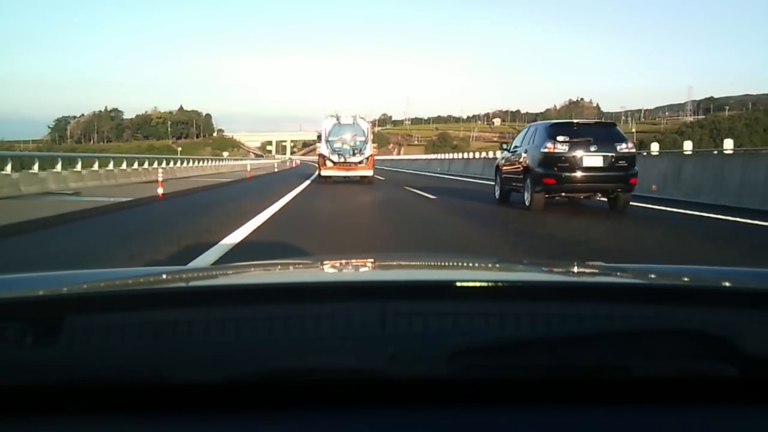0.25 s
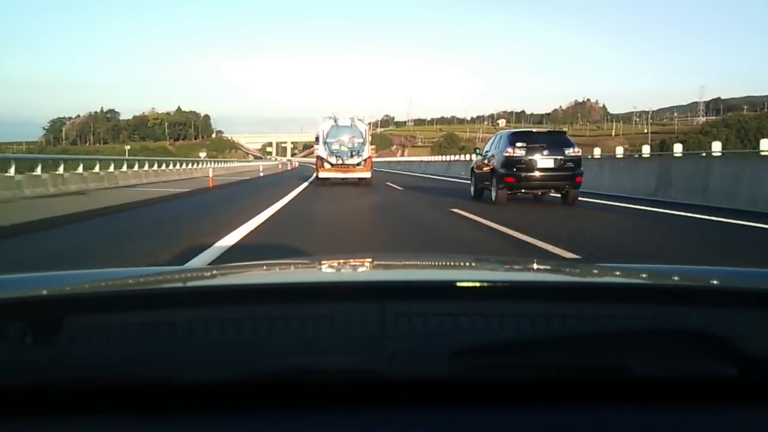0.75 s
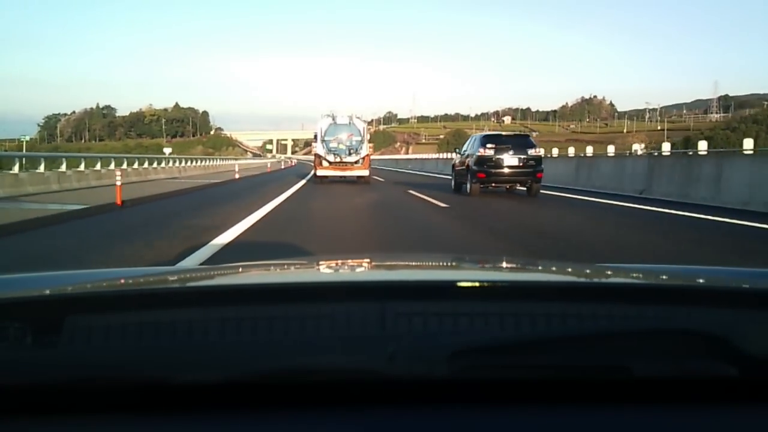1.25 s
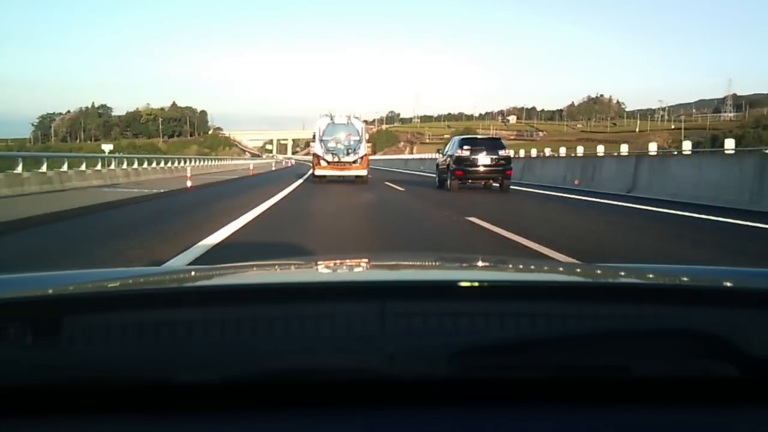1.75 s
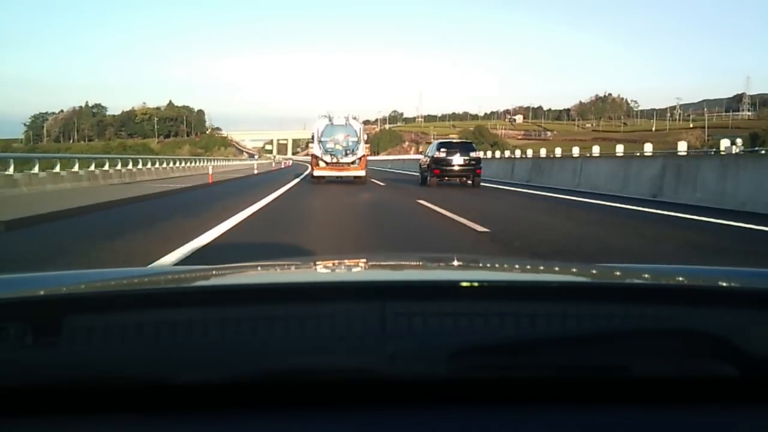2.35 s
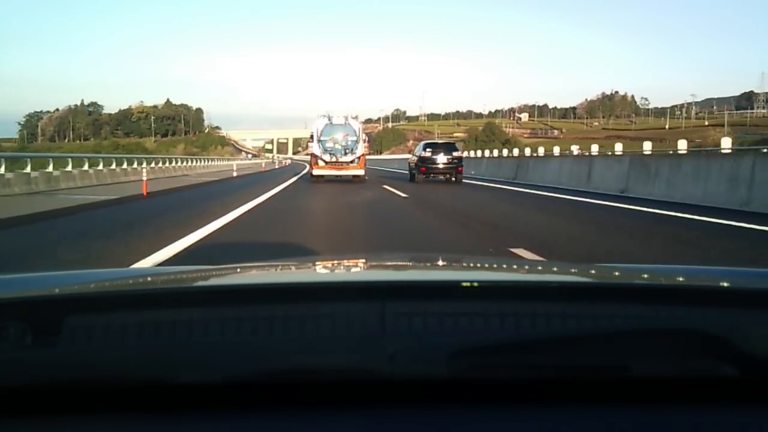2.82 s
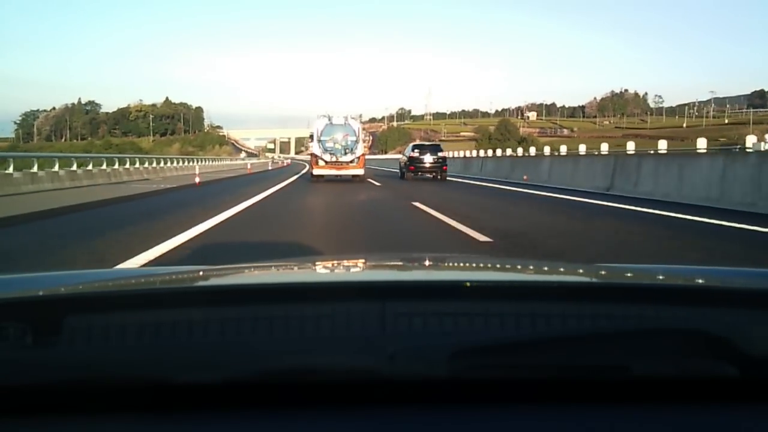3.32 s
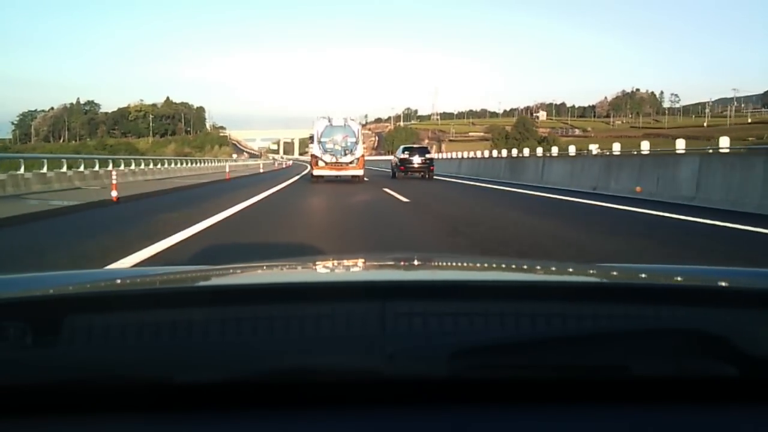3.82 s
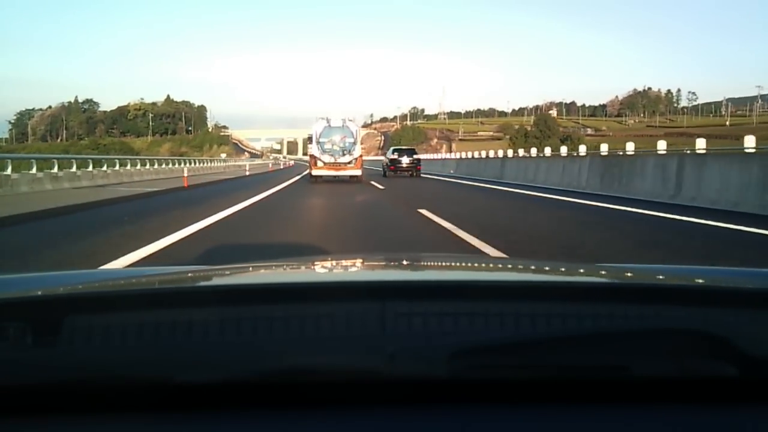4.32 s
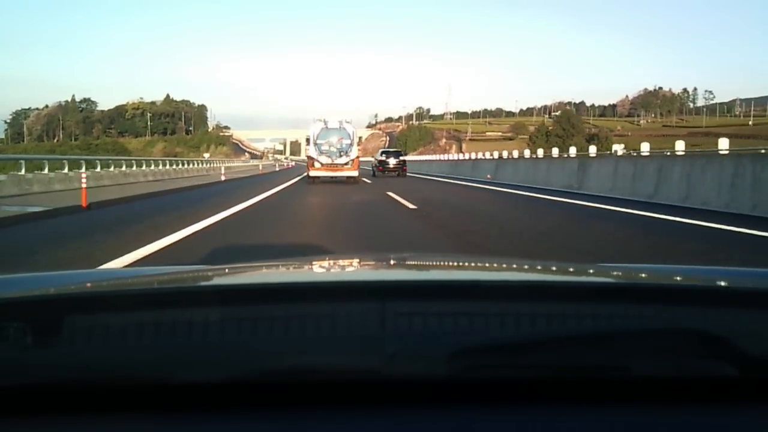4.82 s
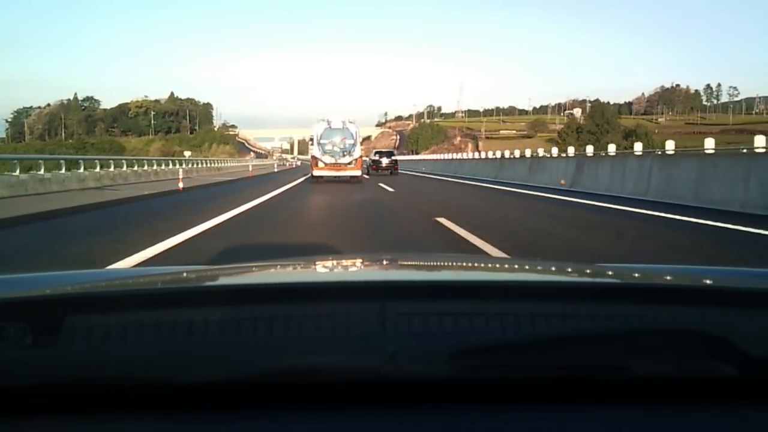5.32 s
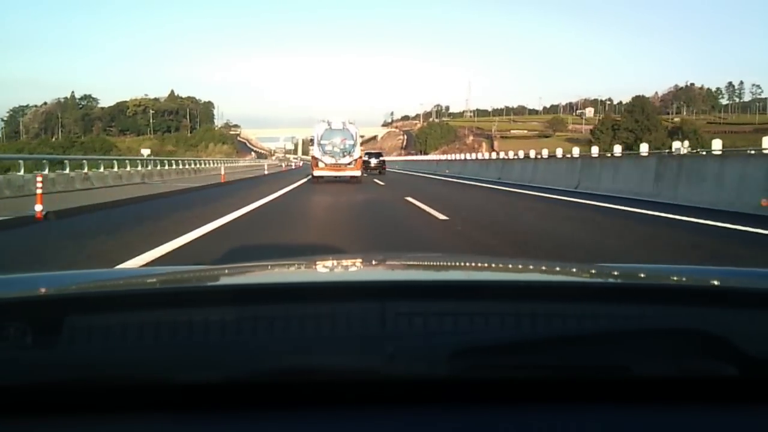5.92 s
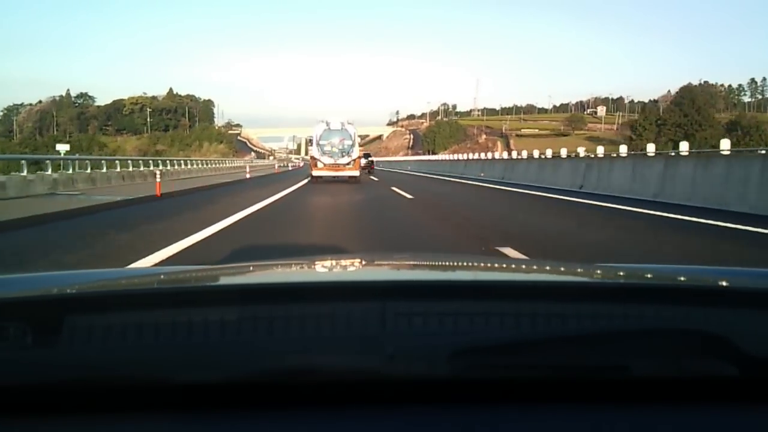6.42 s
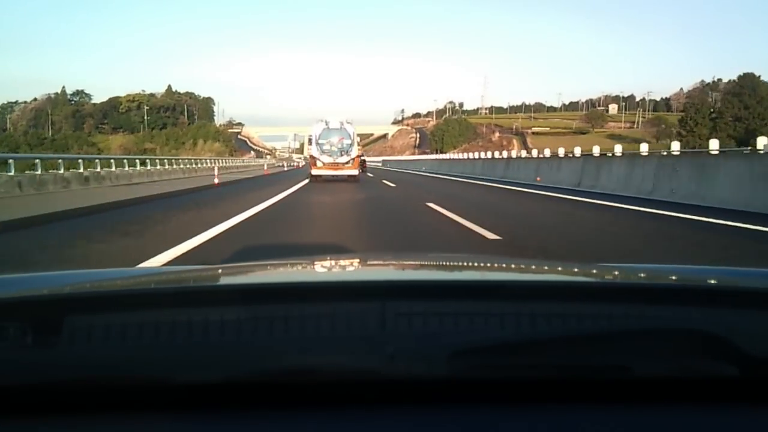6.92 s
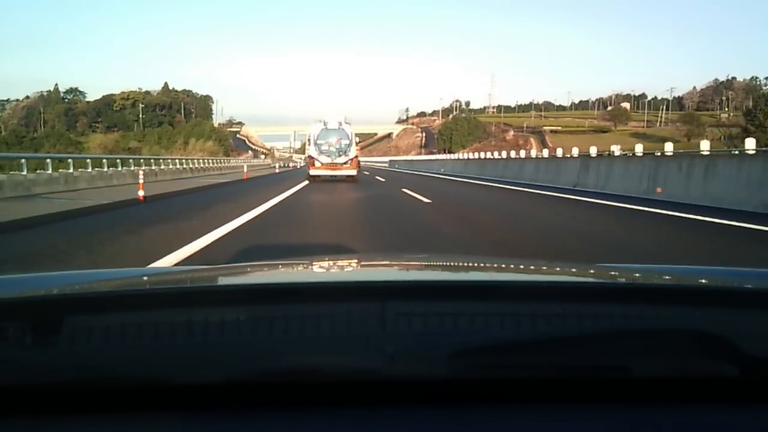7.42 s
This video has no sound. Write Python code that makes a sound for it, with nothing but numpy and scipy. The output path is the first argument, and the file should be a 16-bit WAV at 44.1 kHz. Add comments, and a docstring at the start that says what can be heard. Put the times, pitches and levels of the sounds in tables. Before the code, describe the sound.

A dashboard microphone in a small, dry cabin, with dull, limited treble. Continuous low road rumble, mid-range tyre roar and wavering tread hum fill the space, swelling briefly on small bumps. Dry plastic ticks and rattles cluster early and thin out later. The engine note sags slightly while coasting, then hardens as it pulls; near the end comes one bright crack.

```python
"""Inside a car cruising on a motorway. Shaped noise makes the rumble, roar and hiss of tyres, road and air;
tones locked to the wheel make the tyres hum. The four-cylinder engine eases off, coasts, then pulls,
with a faint whine: each is a set of tones locked to the crankshaft. Loose dashboard plastic chatters
in bursts of tiny noisy contacts and ringing modes, and once snaps sharply."""
import sys
import numpy as np
from scipy import signal
from scipy.fft import rfft, irfft
from scipy.io import wavfile

SR = 44100
rng = np.random.default_rng(int(sys.argv[2]) if len(sys.argv) > 2 else 0)


def persist_wave(psi):
    """Save psi, clipped to +-1, as 16-bit WAV."""
    counts = np.round(np.clip(psi, -1, 1) * 32767).astype(np.int16)
    wavfile.write(sys.argv[1], SR, np.atleast_2d(counts).T)


N = 337806  # length in samples


def from_db(db):
    """Decibels to gain."""
    return 10 ** (np.asarray(db) / 20)


def rms_one(x):
    """Scale to unit power."""
    return x / np.sqrt(np.mean(x ** 2) + 1e-20)


def in_time(rows):
    """Each column of a curve, sample by sample."""
    s, *columns = np.transpose(rows)
    return [np.interp(np.arange(N) / SR, s, c) for c in columns]


def drift(rate_hz):
    """Smooth random wandering with a spread of one."""
    step = 40  # drawn once per 40 samples, then joined by straight lines
    settle = 2000  # points thrown away while the filter settles
    r = np.exp(-2 * np.pi * rate_hz * step / SR)
    draws = rng.standard_normal(N // step + 2 + settle)
    slow = rms_one(signal.lfilter([1], [1, -2 * r, r * r], draws)[settle:])
    return np.interp(np.arange(N) / step, np.arange(len(slow)), slow)


def noise(spectrum, top_slope_db):
    """Unit noise with the given colour, falling by so many dB an octave above its last point."""
    hz, db = np.transpose(spectrum)
    bin_hz = np.arange(N // 2 + 1) * SR / N
    octave = np.log2(bin_hz + 1)  # the 1 avoids log of zero
    colour = np.interp(octave, np.log2(hz), db, left=-60)
    colour = colour - top_slope_db * np.maximum(octave - np.log2(hz[-1]), 0)
    return rms_one(irfft(rfft(rng.standard_normal(N)) * from_db(colour), N))


def ring(force, hz, t60):
    """One damped mode, losing 60 dB in t60 seconds; a unit click rings with height one."""
    r = from_db(-60 / (t60 * SR))
    w = 2 * np.pi * hz / SR
    return signal.lfilter([0, np.sin(w)], [1, -2 * r * np.cos(w), r * r], force + 1e-18)


def partial(turns, order, waver_db, waver_hz, slip):
    """A unit tone locked to a shaft, wavering in strength and, by slip radians, in phase."""
    phase = 2 * np.pi * (np.round(order) * turns + rng.random()) + slip * drift(waver_hz)
    return rms_one(from_db(waver_db * drift(waver_hz)) * np.sin(phase))


def blows(s, db):
    """A click for each contact."""
    force = np.zeros(N)
    force[np.round(s * SR).astype(int)] = from_db(db)
    return force


def cabin(x, t60, wet_db):
    """Close glass and soft seats give a dense, very short tail."""
    t = np.arange(SR // 10) / SR
    tail = rng.standard_normal(len(t)) * from_db(-60 * t / t60) * (t > .001)
    return x + from_db(wet_db) * signal.fftconvolve(x, tail / np.linalg.norm(tail))[:N]


# Low booms of the cabin: f/Hz, width/Hz, level/dB
CABIN_BOOMS = [(52.2, 3.7, -29), (221.4, 8, -29.5), (710, 9.3, -43.5)]
# Ringing of the air inside the tyres: t/s, level/dB
TYRE_AIR_LEVEL = [(0, -29), (.5, -27), (1.1, -34), (2, -35), (2.5, -32), (3.2, -36), (5, -36), (5.8, -30),
                  (6.6, -32), (7.66, -35)]
TYRE_AIR_HZ = 201.4
# Colour of the rumble through the body: f/Hz, relative level/dB per Hz
RUMBLE_COLOUR = [(20, -10), (33, -6), (50, -2.5), (70, -2.5), (95, -2.3), (125, -3.8), (180, -6),
                 (235, -3.6), (290, -4.5), (345, -3.1), (375, -3.3), (412, -16)]


def body():
    """Road shocks shake the floor and set the cabin and the air in the tyres booming."""
    booms = 0
    for hz, width_hz, db in CABIN_BOOMS:
        t60 = np.log(1000) / (np.pi * width_hz)  # a narrow boom rings longer
        booms = booms + from_db(db) * rms_one(ring(rng.standard_normal(N), hz, t60))
    cycles = TYRE_AIR_HZ * np.arange(N) / SR
    tyre_air = partial(cycles, order=1, waver_db=2.0, waver_hz=1.5, slip=.9)
    rumble = from_db(-19.5) * noise(RUMBLE_COLOUR, top_slope_db=49.0)
    return booms + from_db(in_time(TYRE_AIR_LEVEL)[0]) * tyre_air + rumble


# Colour of the tyre roar on the asphalt: f/Hz, relative level/dB per Hz
ROAR_COLOUR = [(300, -15), (415, -0.5), (450, 2), (520, -2), (600, 2), (645, 3.5), (675, -4.5), (740, -4),
               (855, -5.5), (890, -10), (930, -10.5), (1000, -13.5), (1200, -22.5)]
# Colour of the wind hiss: f/Hz, relative level/dB per Hz
HISS_COLOUR = [(700, 1.5), (1350, 0.5), (1550, -1.5), (2300, -7), (2600, -7.5), (2950, -8.5), (3300, -10.5),
               (3700, -14), (5000, -16), (5900, -19.5), (6800, -20), (7800, -21)]
# Slowly changing grain of the asphalt, before bumps and offsets: t/s, roar level/dB, hiss level/dB
ASPHALT = [(0.0, -31, -49.5), (0.25, -30.5, -49), (0.6, -28, -49.5), (1.05, -29, -48.5), (1.35, -29, -50),
           (1.9, -28, -49), (2.6, -29.5, -50.5), (3.3, -28.0, -50), (3.5, -30, -50), (3.8, -30.5, -50.5),
           (4.0, -27, -49), (4.7, -29, -50.5), (5.1, -28.5, -50), (5.6, -28.5, -51), (6.8, -29.5, -50),
           (7.4, -28.5, -48.5), (7.66, -31.5, -51.5)]
# Bumps under the tyres: t/s, rise of the roar level/dB
ROAD_BUMPS = [(0.3, 6), (0.56, 3.5), (0.77, 5.5), (1.2, 5.5), (1.75, 3), (2.03, 6), (2.36, 3.5),
              (2.44, 2.5), (2.99, 3.5), (3.14, 5), (3.28, 2.5), (3.97, 5.5), (4.09, 5.5), (4.48, 4),
              (4.65, 5.5), (5.04, 4.5), (6.18, 3), (6.57, 4), (7.17, 3.5), (7.39, 4), (7.56, 5.5)]
BUMP_HALF_S = 0.022  # a bump swells and fades over about this time
BUMP_HISS_SHARE = .28  # share of a bump's dB rise that the hiss follows


def rush(wheel_hz):
    """Roar and hiss swell on each bump, flutter together over the asphalt and throb twice per wheel turn."""
    roar_db, hiss_db = in_time(ASPHALT)
    t = np.arange(N) / SR
    bump_db = sum(db * np.exp(-np.minimum(((t - s) / BUMP_HALF_S) ** 2, 20)) for s, db in ROAD_BUMPS)
    throb = np.sin(4 * np.pi * np.cumsum(wheel_hz) / SR)
    flutter = drift(25) + 0.44 * drift(70) + 0.36 * throb
    roar_db = roar_db + bump_db + 1.05 + 1.62 * flutter
    hiss_db = hiss_db + BUMP_HISS_SHARE * bump_db + 3.0 + 1.3 * flutter + 1.6 * drift(27)
    roar = from_db(roar_db) * noise(ROAR_COLOUR, top_slope_db=40.5)
    hiss = from_db(hiss_db) * noise(HISS_COLOUR, top_slope_db=33.0)
    return roar + hiss


# Hum of the uneven tread, before its swells: multiple of the wheel's turn, level/dB
TREAD_TONES = [(3, -40), (4, -35), (5, -32), (9, -41), (11, -41), (15, -38), (18, -39), (24, -42),
               (25, -41), (26, -35), (27, -34), (28, -31), (29, -37.5), (30, -32.6), (31, -35.5), (32, -41),
               (34, -40), (41, -47), (48, -50), (49, -50), (54, -51), (58, -51)]
# A tread tone swells and fades: multiple of the wheel's turn, t/s, half length/s, rise/dB
TONE_SWELLS = [(28, .2, .5, 5), (29, 1.2, 1, 12.5), (25, 1.5, 3.2, 13.5), (30, 1.8, .9, 7),
               (31, 2.2, .7, 6), (30, 3.6, .9, 5), (28, 3.6, 1.4, 8.5), (32, 3.9, .8, 8), (34, 4, .8, 7.5),
               (27, 4.5, .6, 8), (24, 5.3, .6, 11), (31, 5.3, .5, 8), (25, 5.6, 1.2, 6), (30, 5.2, .5, 4),
               (29, 6.4, .7, 12), (28, 6.8, .4, 5), (30, 7.3, 1.2, 7.5)]


def tread(wheel_hz):
    """The tread repeats every turn; its tones glide with the speed and come forward one after another."""
    turns = np.cumsum(wheel_hz) / SR
    t = np.arange(N) / SR
    hum = 0
    for k, db in TREAD_TONES:
        lift_db = sum(rise * np.exp(-((t - s) / half) ** 2)
                      for order, s, half, rise in TONE_SWELLS if order == k)
        hum = hum + from_db(db + lift_db) * partial(turns, k, waver_db=1.0, waver_hz=.6, slip=.1)
    return hum


# How hard the engine pulls: t/s, load (0 to 1)
ENGINE_LOAD = [(0, .55), (1.5, .35), (2.8, 0), (4.3, 0.03), (4.75, 0.97), (7.66, 0.97)]
# Engine drone: multiple of the crank's turn, coasting level/dB, pulling level/dB
DRONE_TONES = [(1, -37.5, -33.5), (2, -26, -39), (4, -31, -35.5), (6, -43, -24.5), (8, -41, -36),
               (10, -57.5, -52.5)]
# Whine, before its swell: multiple of the crank's turn, coasting level/dB, pulling level/dB
WHINE_TONES = [(31, -70, -62.5), (32, -72, -63.5), (33, -62, -54.5), (34, -74.5, -61), (35, -59.5, -58.5),
               (36, -80.5, -63)]
# Swell of the whine: t/s, added level/dB
WHINE_LEVEL = [(0, -8.5), (2.2, -9.5), (3.3, 3), (4.3, 2), (5.1, 0), (6.2, -1), (7.66, -5.5)]


def engine(turns):
    """Two firings a turn; load shifts the drone from the firing note to its third harmonic."""
    load = np.clip(in_time(ENGINE_LOAD)[0], 0, 1)
    drone, whine = 0, 0
    for k, coast, pull in DRONE_TONES:
        gain = from_db(coast + load * (pull - coast))
        drone = drone + gain * partial(turns, k, waver_db=1.0, waver_hz=1.2, slip=.1)
    for k, coast, pull in WHINE_TONES:
        gain = from_db(coast + load * (pull - coast))
        whine = whine + gain * partial(turns, k, waver_db=2.0, waver_hz=2.5, slip=.25)
    return drone + whine * from_db(in_time(WHINE_LEVEL)[0])


STRAY_PER_S = 6.1  # average number of faint single touches a second
STRAY_DB, STRAY_RANGE_DB = -49.5, 7.5  # middle level, and whole range from softest to hardest


def stray_touches():
    """Even on smooth asphalt the panel stirs now and then."""
    draws = rng.random((200, 3))
    share_kept = STRAY_PER_S * N / SR / len(draws)
    return [(when * (N - 1) / SR, STRAY_DB + STRAY_RANGE_DB * (hard - .5), 0, 0)
            for when, hard, chance in draws if chance < share_kept]


# Rattles of the loose panel: t/s of the hardest touch, touches before it, touches after it,
# time between touches/s, level/dB of the hardest touch, added knock/dB, added edge/dB
RATTLE_BURSTS = [(.2611, 1, 1, .0075, -34.5, -4, 2), (.278, 0, 1, .0062, -33.5, -4, 3),
                 (.2905, 0, 1, .0055, -36.5, 0, 1), (.3947, 0, 1, .006, -38, 4, -3),
                 (.413, 0, 1, .0064, -38.5, 2, -1), (.4347, 1, 0, .0065, -38, 0, 1),
                 (.441, 0, 1, .008, -39, -1, 2), (.517, 1, 0, .0055, -43, 0, 0),
                 (.5657, 0, 0, .007, -42, 0, -4), (.5752, 0, 1, .008, -32.5, 0, 2),
                 (.5915, 0, 0, .007, -34.5, 0, 4), (.599, 0, 0, .007, -35, -1, 2),
                 (.614, 1, 0, .007, -31.3, 5, 3), (.621, 0, 1, .0085, -31.3, 5, 3),
                 (.642, 1, 1, .0065, -39.5, 1, -3), (.6555, 0, 0, .007, -40, 0, -5),
                 (.6904, 0, 0, .007, -38, -1, 2), (.7545, 0, 0, .007, -41, 0, 0),
                 (.7642, 1, 0, .005, -32.5, 1, 1), (.7712, 0, 1, .0078, -33, 3, 0),
                 (.787, 0, 0, .007, -39.5, 2, -1), (.8923, 0, 0, .007, -38.5, 0, 0),
                 (.9215, 0, 1, .006, -36, 2, -2), (.933, 0, 0, .007, -38.5, 2, -4),
                 (.9437, 0, 2, .006, -38.5, 2, -3), (.966, 0, 0, .007, -38, -2, 1),
                 (.9724, 0, 0, .007, -37.5, -1, 1), (.9878, 1, 0, .007, -35, -3, 1),
                 (1.048, 1, 0, .006, -39, 0, 0), (1.7336, 1, 0, .006, -41, 4, -2),
                 (1.7435, 0, 0, .007, -40, 4, -2), (1.751, 0, 0, .007, -40.5, 3, -2),
                 (2.0105, 0, 1, .0075, -39, 0, 0), (2.035, 2, 0, .0083, -31.5, 7, -1),
                 (2.0398, 0, 0, .0055, -33, 7, -4), (2.208, 1, 1, .0085, -42, 0, 0),
                 (2.9578, 0, 0, .007, -40.5, 2, -2), (3.038, 0, 0, .007, -41.5, 2, -2),
                 (3.141, 0, 1, .0074, -40, 5, -2), (3.3277, 0, 0, .007, -40.5, 6, -4),
                 (3.9625, 1, 0, .0076, -32.3, 0, 0), (3.97, 0, 0, .007, -32.3, 1, -1),
                 (3.9775, 0, 2, .0078, -32.5, 0, -2), (4.2174, 0, 1, .0072, -37, -2, 2),
                 (4.559, 0, 0, .007, -38.5, 2, -7), (4.6295, 1, 0, .0067, -42.5, 1, -2),
                 (4.6468, 0, 1, .0056, -32.5, 0, -2), (5.9645, 0, 0, .007, -40, 6, 4),
                 (7.576, 1, 0, .0073, -42.5, 2, 0)]
BOUNCE_JITTER_S, TOUCH_SPREAD_DB = 0.00018, 1.2  # chance in each touch's time and strength
BUILD_DB, LOSS_DB = 6.5, 5.5  # gain per touch as a rattle builds, loss per touch as it dies


def touches():
    """The loose panel bounces at a nearly steady rate, building to a hardest touch and dying away."""
    events = []
    for s, before, after, bounce_s, db, knock_db, edge_db in RATTLE_BURSTS:
        for k in range(-round(before), round(after) + 1):  # 0 is the hardest touch
            late, harder = rng.standard_normal(2)
            touch_db = db + min(k * BUILD_DB, -k * LOSS_DB) + harder * TOUCH_SPREAD_DB
            events.append((s + k * bounce_s + late * BOUNCE_JITTER_S, touch_db, knock_db, edge_db))
    return events


# Colour of a light touch on the plastic: f/Hz, relative level/dB per Hz
TOUCH_COLOUR = [(700, -3), (1200, 0), (1550, 2), (2000, 1.5), (2450, -4.5), (3120, 3), (3750, -3),
                (4500, -4.5), (5400, -8), (6000, -7.5), (6700, -6.3), (7250, -10), (7550, -30)]
# Modes of the loose panel: f/Hz, time to fall by 60 dB/s, level/dB relative to the touch
PANEL_MODES = [(1080, .01, -8), (1490, .014, -3), (1950, .013, -3.5), (3020, .009, -1), (3220, .01, 0),
               (4000, .009, -7.5), (4570, .008, -10), (6650, .007, -10)]
KNOCK_BELOW_HZ, EDGE_ABOVE_HZ = 2500, 5500  # knock lies under the first, edge above the second
MODE_SPREAD_DB, MODE_SPREAD_SHARE = 1.2, .015  # chance in each mode's level and frequency (share of f)


def chatter(level_db, graze_s, crest):
    """Each touch grazes the plastic in tiny contacts and rings the panel differently as its seat shifts."""
    t = np.arange(SR // 50) / SR
    s, db, knock_db, edge_db = np.transpose(touches() + stray_touches())

    # Grazes: short bursts of softly limited noise, with the bright edge set apart
    grit = rms_one(np.tanh(noise(TOUCH_COLOUR, top_slope_db=31.0) / crest))
    above_edge = np.arange(N // 2 + 1) * SR / N > EDGE_ABOVE_HZ
    edge = irfft(rfft(grit) * above_edge, N)
    press = from_db(level_db) * t / graze_s * np.exp(1 - t / graze_s)  # strongest after graze_s
    out = (grit - edge) * signal.fftconvolve(blows(s, db), press)[:N]
    out = out + edge * signal.fftconvolve(blows(s, db + edge_db), press)[:N]

    # Ringing: knock lifts or lowers the low modes, edge the high ones
    hz, t60, mode_db = np.transpose(PANEL_MODES)[:, :, None]
    starts = np.round(s * SR).astype(int)
    for start, hit_db, knock, sharp in zip(starts, db, knock_db, edge_db):
        harder, higher = rng.standard_normal((2, len(PANEL_MODES), 1))
        strength_db = hit_db + mode_db + MODE_SPREAD_DB * harder
        strength_db = strength_db + knock * (hz < KNOCK_BELOW_HZ) + sharp * (hz > EDGE_ABOVE_HZ)
        mode_hz = hz * (1 + MODE_SPREAD_SHARE * higher)
        modes = from_db(strength_db - 60 * t / t60) * np.sin(2 * np.pi * mode_hz * t)
        signs = rng.choice([-1, 1], len(PANEL_MODES))
        out[start:start + len(t)] += (signs @ modes)[:N - start]
    return out


# A sharp snap of the plastic and its rebounds: t/s, blow level/dB
SNAP_BLOWS = [(6.3058, -13), (6.3138, -29), (6.3195, -37)]
# Modes of the snapping trim: f/Hz, time to fall by 60 dB/s, level/dB relative to the blow
TRIM_MODES = [(1580, .013, -15), (1900, .009, -14), (2500, .008, -15), (2880, 0.019, -10.5),
              (3170, 0.019, -10.5), (3850, 0.014, -10), (4230, 0.009, -5), (4770, 0.0042, 2.5),
              (5390, 0.0046, 2.2), (6200, 0.0082, -7), (6830, 0.008, -5.5), (7450, .006, -11)]


def snap(level_db):
    """A clean blow and its rebounds ring all the modes of the trim, with alternating signs."""
    force = blows(*np.transpose(SNAP_BLOWS))
    return sum((-1) ** k * from_db(db + level_db) * ring(force, hz, t60)
               for k, (hz, t60, db) in enumerate(TRIM_MODES))


# Crankshaft speed: t/s, f/Hz (turns per second)
CRANK_SPEED = [(0.0, 43.08), (1.0, 42.51), (2.0, 41.82), (3.0, 41.18), (4.25, 40.43), (5.0, 40.61),
               (6.0, 41.0), (7.66, 41.65)]
GEAR_RATIO = 3.763  # crank turns per wheel turn


def scene():
    """Engine and wheels turn together through top gear, while the loose plastic rattles and snaps."""
    crank_hz = in_time(CRANK_SPEED)[0]
    wheel_hz = crank_hz / GEAR_RATIO
    drive = body() + rush(wheel_hz) + tread(wheel_hz) + engine(np.cumsum(crank_hz) / SR)
    rattle = cabin(chatter(level_db=-1.2, graze_s=0.0007, crest=2.5), t60=0.055, wet_db=-12)
    crack = cabin(snap(level_db=2.0), t60=0.056, wet_db=-11)
    return (drive + rattle + crack)[None]


DROOP_HZ, CUTOFF_HZ = 7420, 7950


def record(dry):
    """The treble droops steeply from DROOP_HZ and is cut off just above CUTOFF_HZ."""
    dull = signal.sosfilt(signal.butter(12, DROOP_HZ, fs=SR, output="sos"), dry)
    return signal.sosfilt(signal.ellip(12, .2, 80, CUTOFF_HZ, fs=SR, output="sos"), dull)


dry = scene()
out = record(dry)
persist_wave(out)
```